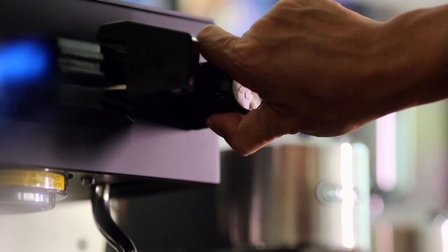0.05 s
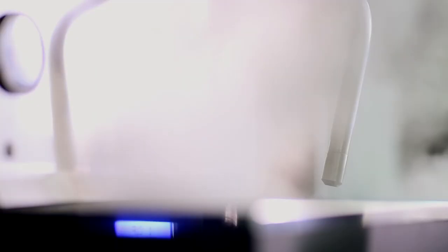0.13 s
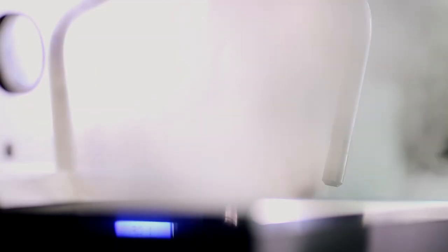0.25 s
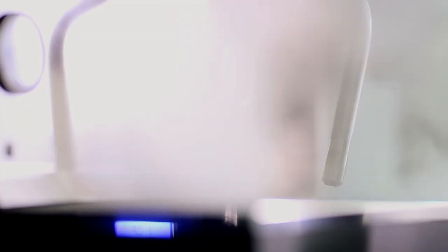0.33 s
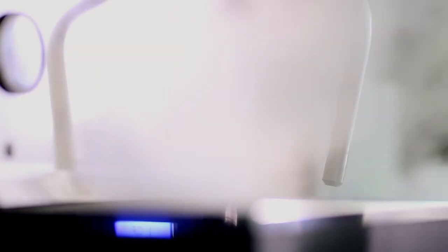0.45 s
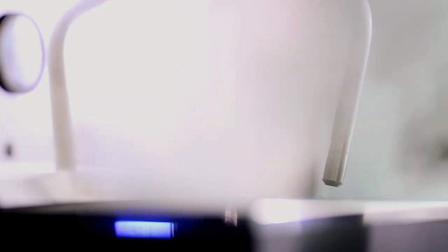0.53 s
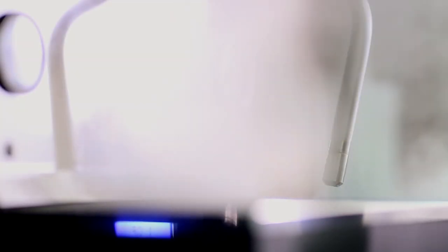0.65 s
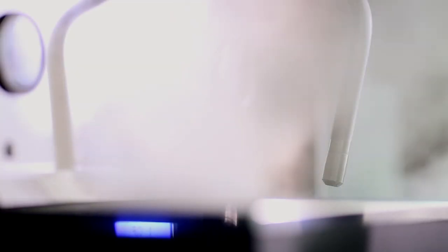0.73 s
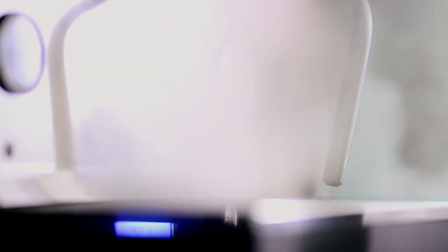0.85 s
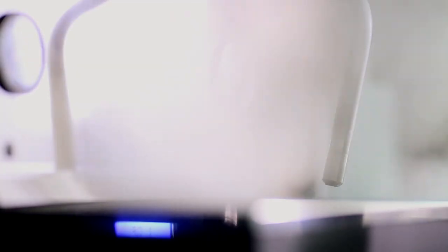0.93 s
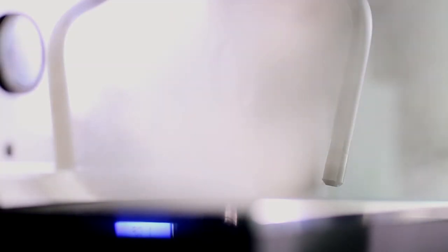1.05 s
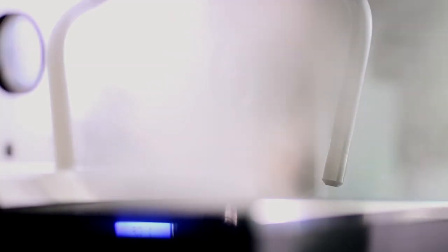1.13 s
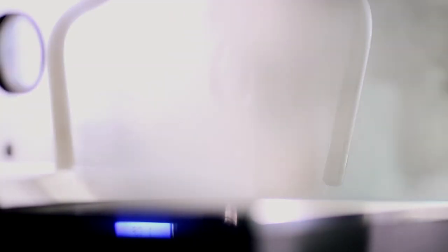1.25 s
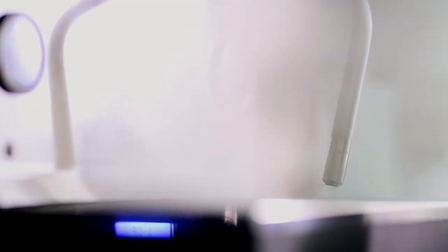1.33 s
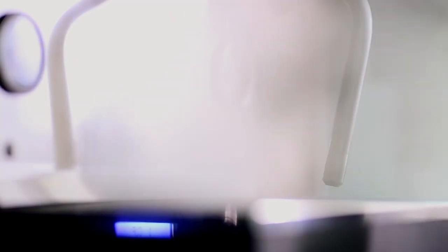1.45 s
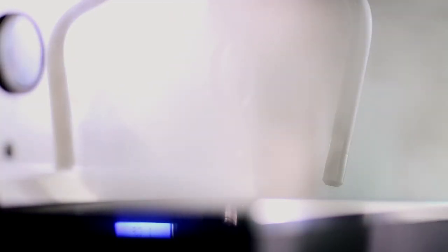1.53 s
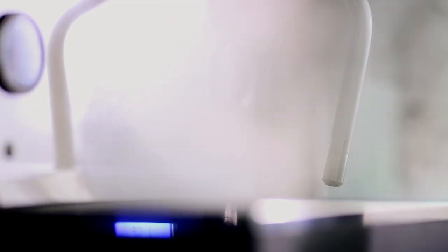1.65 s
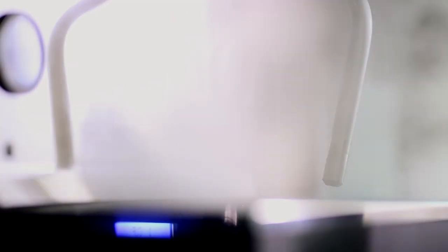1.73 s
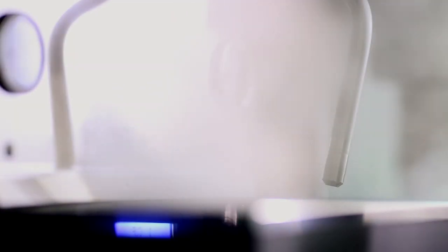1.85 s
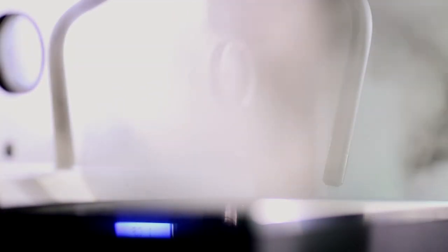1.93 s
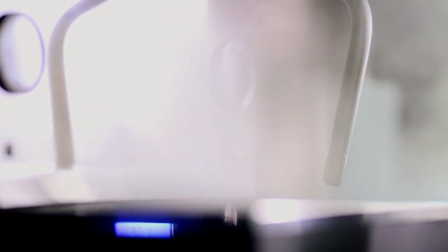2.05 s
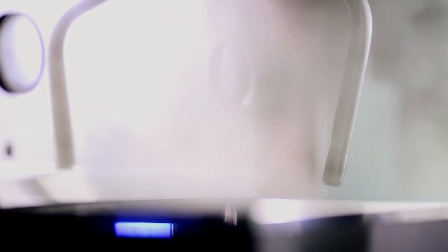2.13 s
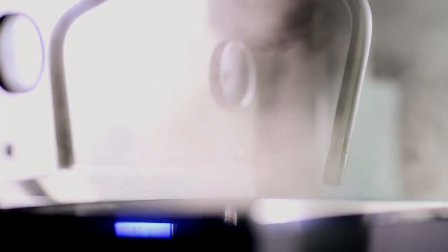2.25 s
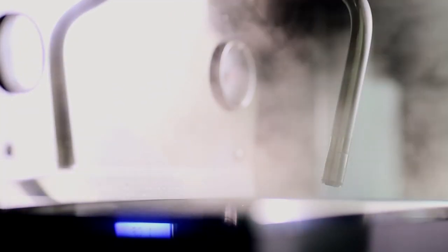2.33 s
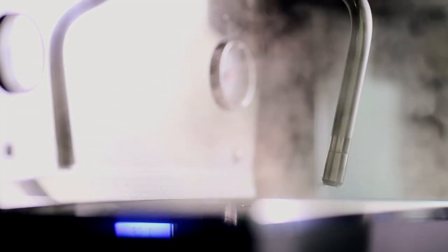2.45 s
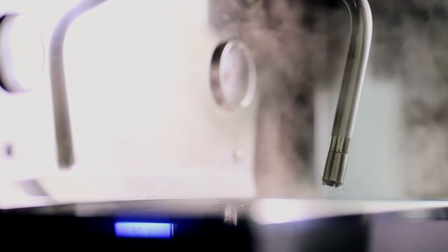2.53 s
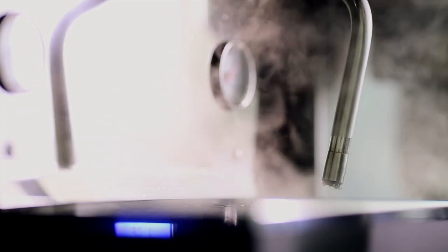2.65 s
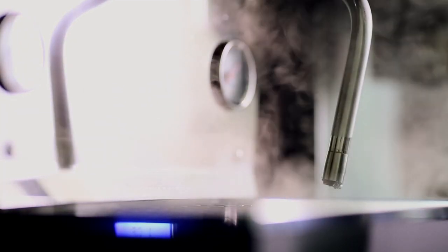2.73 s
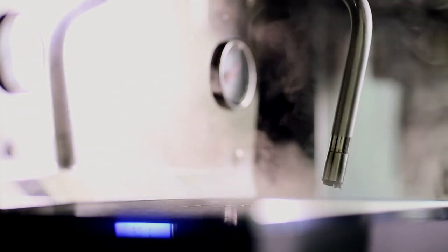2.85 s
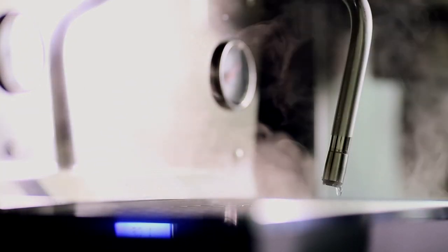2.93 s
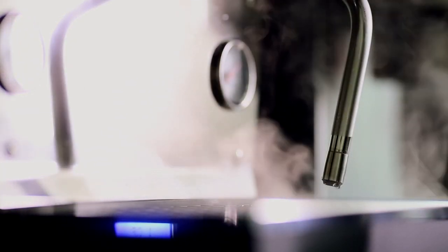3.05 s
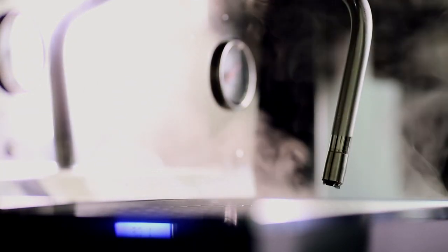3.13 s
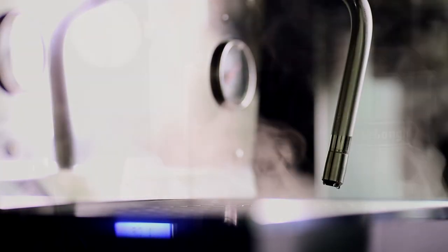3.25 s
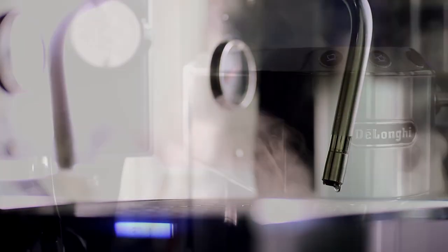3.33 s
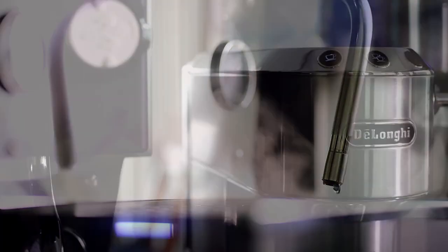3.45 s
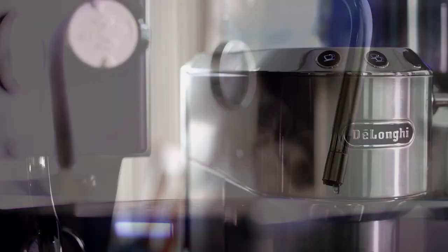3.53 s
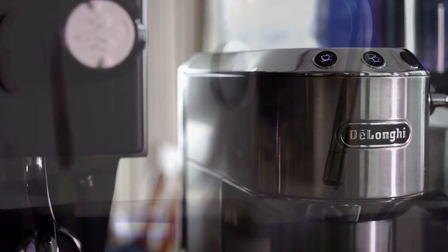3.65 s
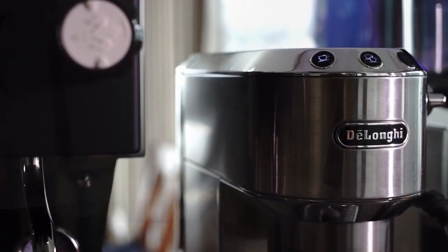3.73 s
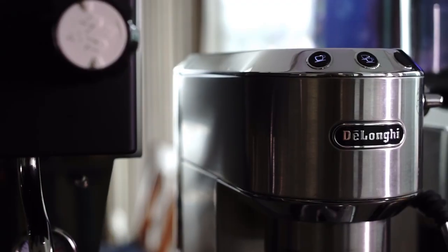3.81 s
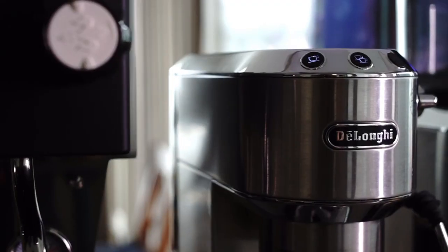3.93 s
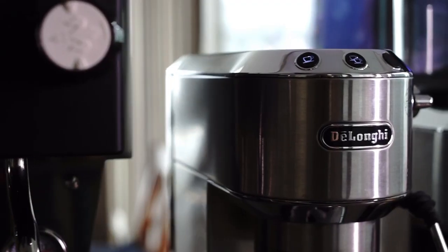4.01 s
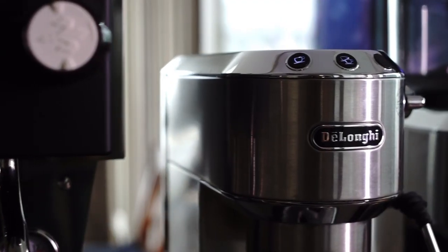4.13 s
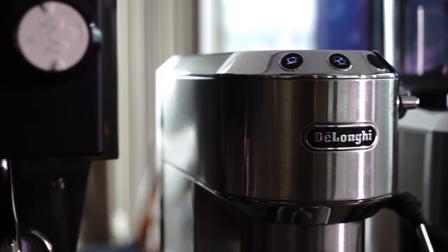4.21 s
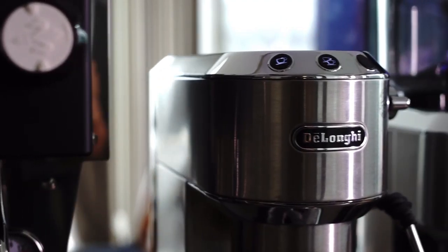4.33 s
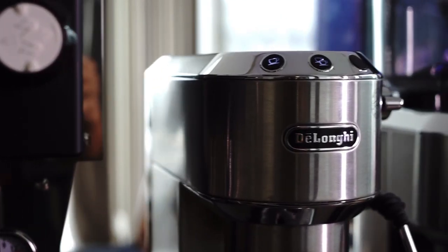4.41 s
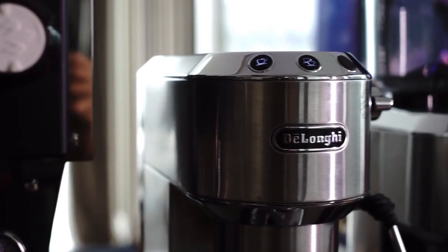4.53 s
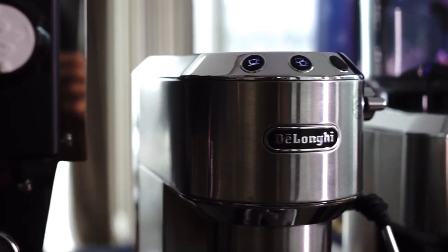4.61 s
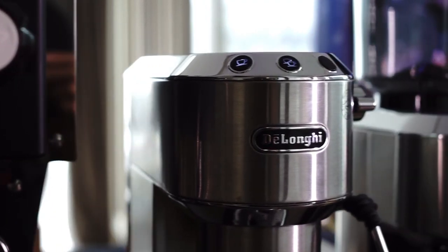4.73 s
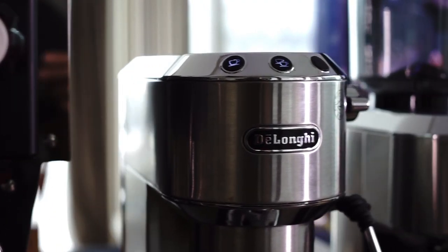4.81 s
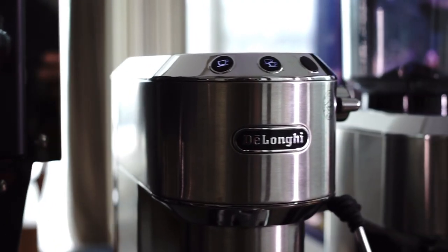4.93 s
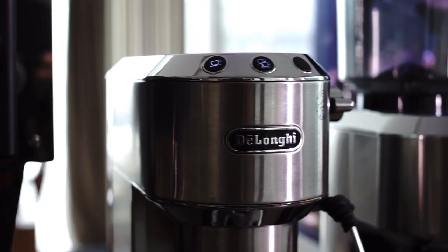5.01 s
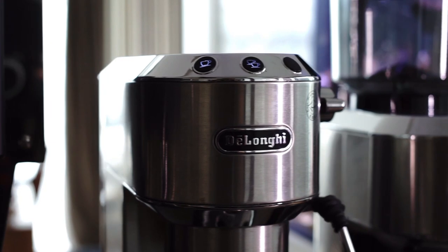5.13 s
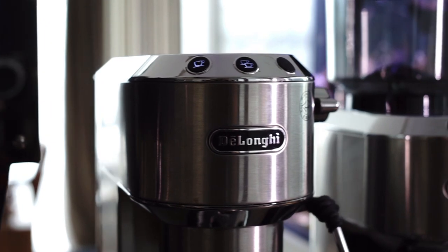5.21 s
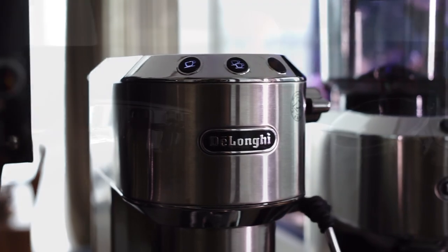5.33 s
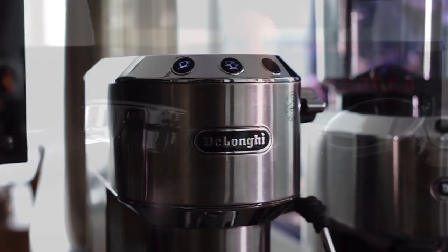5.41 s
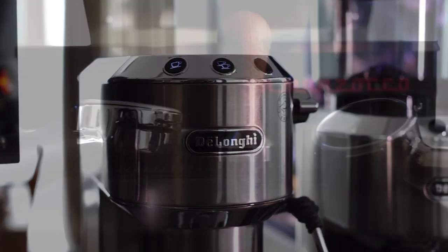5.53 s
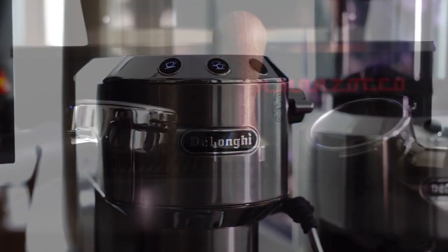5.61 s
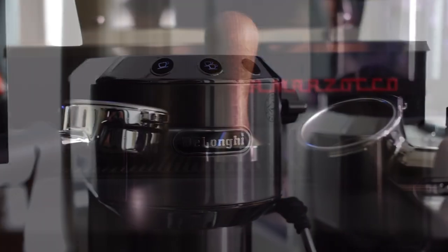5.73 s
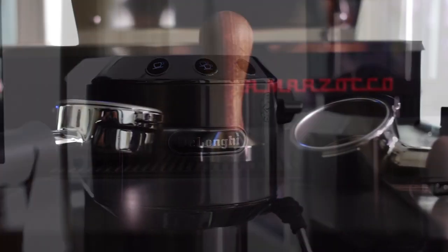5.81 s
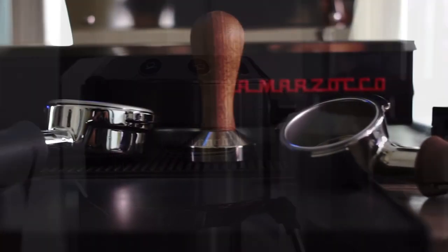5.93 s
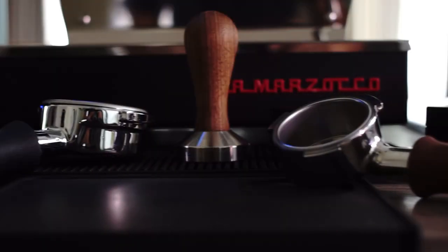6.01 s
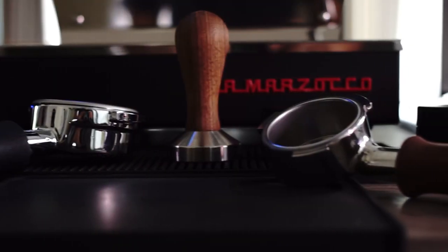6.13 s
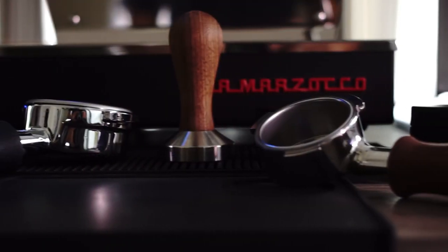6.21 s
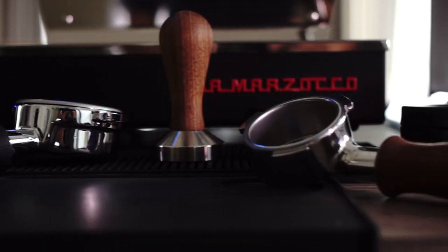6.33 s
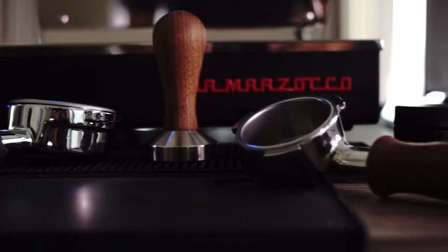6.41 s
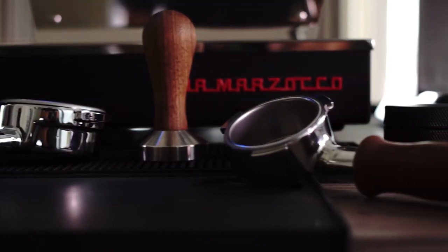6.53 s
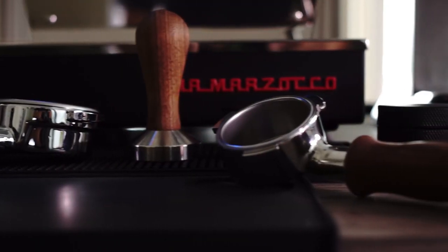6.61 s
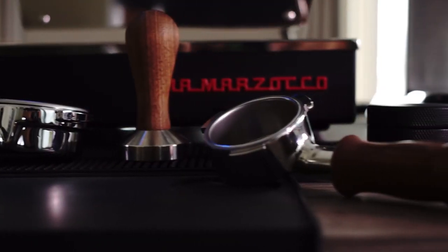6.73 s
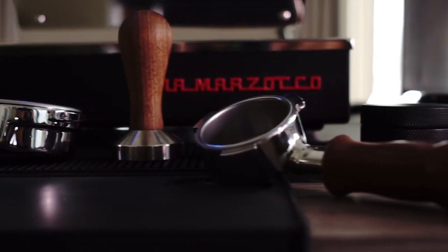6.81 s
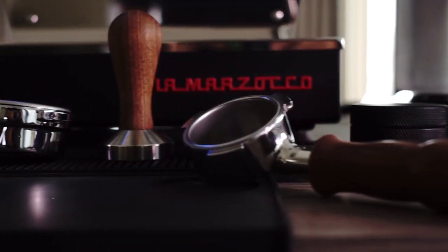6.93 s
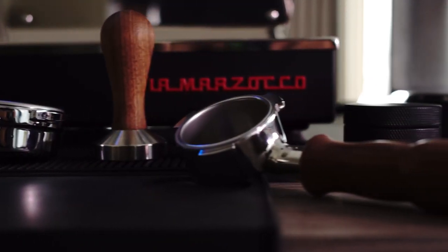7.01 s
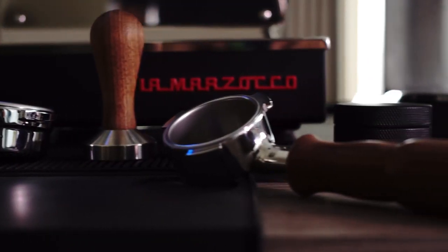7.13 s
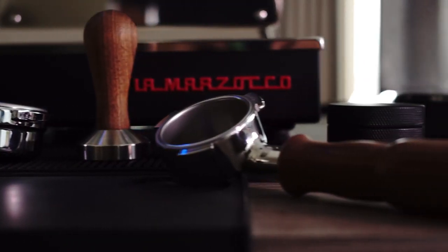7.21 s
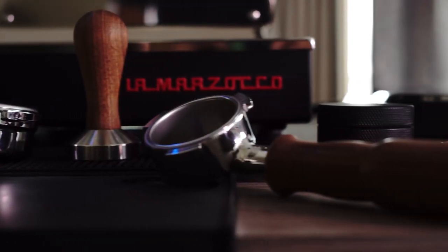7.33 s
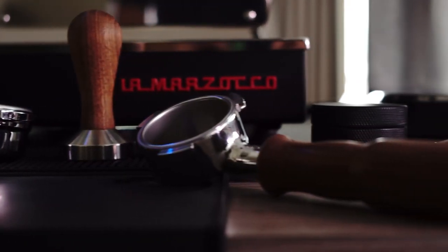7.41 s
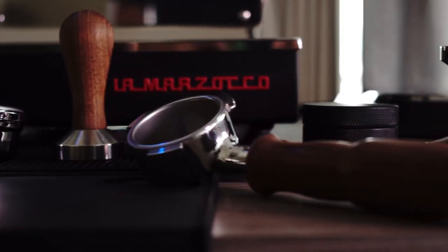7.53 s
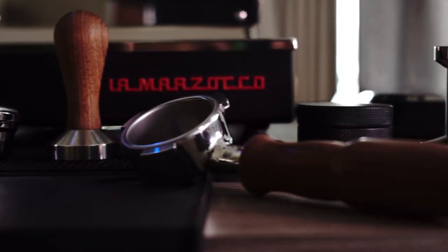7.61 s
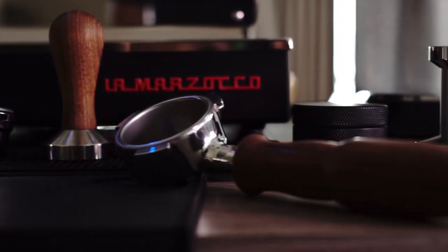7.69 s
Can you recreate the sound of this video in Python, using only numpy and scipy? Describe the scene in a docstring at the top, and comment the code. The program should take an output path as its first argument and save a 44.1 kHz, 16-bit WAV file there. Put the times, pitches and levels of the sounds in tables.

```python
"""A cafe at the microphone: a steam wand's jet hisses at the nozzle and roars on the drip tray, as coloured noise.
At 2.1 s the valve closes; the wand spits once and dribbles out in hollow gulps, noise ringing in pipe modes.
The room comes up: ventilation noise, fluttering low room modes, hum, thin whines and small ticks of banded noise.
The microphone spot fades to a second place from 3.4 s and a third from 5.4 s, where a higher mode throbs
and soft distant tones swell; light dry clicks and a fine crackle, short noise bursts, come close by at the end."""
import sys
import numpy as np
from scipy import signal
from scipy.fft import rfft, irfft, next_fast_len
from scipy.io import wavfile
from scipy.ndimage import uniform_filter1d, map_coordinates

SR = 44100
rng = np.random.default_rng(int(sys.argv[2]) if len(sys.argv) > 2 else 0)


def generate_wav(sig):
    """Save sig (samples, or channels by samples) to the path in sys.argv[1] as 16-bit PCM at SR."""
    pcm = np.round(np.clip(np.atleast_2d(sig).T, -1, 1) * 32767).astype(np.int16)
    wavfile.write(sys.argv[1], SR, pcm)


N = 342216
T = np.arange(N) / SR


def amp(db):
    """Decibels to gain."""
    return 10 ** (np.asarray(db) / 20)


def unit(x):
    """Scale to rms 1."""
    return x / np.sqrt(np.mean(x ** 2) + 1e-20)


def along(points, hz):
    """(f/Hz, value) points joined on a log frequency axis."""
    f, v = np.transpose(points)
    return np.interp(np.log(hz + 1), np.log(f + 1), v)


def wobble(rate):
    """A smooth random curve, rate knots a second."""
    knots = rng.standard_normal(int(N * rate / SR) + 4)
    return map_coordinates(knots, [T * rate])


def fade(start, end):
    """Rises from 0 to 1 between two times."""
    return np.clip((T - start) / max(end - start, 1e-3), 0, 1)


def swells(rows):
    """Sum of smooth bumps, each (t/s, half length/s, height)."""
    return sum(height * np.exp(-((T - s) / half) ** 2) for s, half, height in rows)


def puffs(rows):
    """Gain of sounds that swell out of silence, each (t/s, half length/s, level/dB)."""
    return swells([(s, half, amp(db)) for s, half, db in rows])


def filtered(x, response):
    """x shaped by a response of frequency."""
    size = next_fast_len(N + 8192)
    hz = np.fft.rfftfreq(size, 1 / SR)
    return irfft(rfft(x, size) * response(hz), size)[..., :N]


def colour(spectrum, resonances=()):
    """Response of a broad spectrum lifted or dipped by (f/Hz, full width/Hz, lift/dB) resonances."""
    def response(hz):
        lift_db = sum(db / (1 + (2 * (hz - fc) / width) ** 2) for fc, width, db in resonances)
        return amp(along(spectrum, hz) + lift_db)
    return response


def turbulence(patchy_db):
    """Two unrelated noises whose strength drifts in shared patches of time and frequency."""
    z = signal.stft(rng.standard_normal((2, N)), nperseg=512)[2]
    field = uniform_filter1d(rng.standard_normal(z.shape[1:]), size=8, axis=0)
    field = uniform_filter1d(field, size=12, axis=1)
    return signal.istft(z * amp(patchy_db * unit(field)), nperseg=512)[1][:, :N]


def rush(response, patchy_db, spread=None):
    """Coloured turbulence whose middle has rms 1: mono, or spread by (f/Hz, side over mid/dB) points."""
    def mid_side(hz):
        side_gain = amp(along(spread, hz)) if spread else 0 * hz
        return response(hz) * [np.ones_like(hz), side_gain]
    mid, side = filtered(turbulence(patchy_db), mid_side)
    return np.array([mid + side, mid - side]) / np.std(mid)


def resonance(modes):
    """Even noise of rms 1 ringing in narrow (f/Hz, half width/Hz, level/dB) modes."""
    def response(hz):
        return sum(amp(db) / (1 + ((hz - fc) / width) ** 2) for fc, width, db in modes)
    return unit(filtered(rng.standard_normal(N), response))


def tone(hz, drift, rate):
    """A sine of rms 1 whose phase wanders by drift radians, rate knots a second."""
    return np.sqrt(2) * np.sin(2 * np.pi * hz * T + drift * wobble(rate))


def band_gain(x, lo_hz, hi_hz):
    """The gain that brings one band of a stereo sound's middle to rms 1."""
    return 1 / np.std(filtered(x.mean(0), lambda hz: (hz > lo_hz) & (hz < hi_hz)))


# fades from one microphone spot to the next: start t/s, end t/s
MOVES = [(3.36, 3.87), (5.42, 5.74)]


def spots():
    """The gain of each of the three microphone spots, crossfaded at equal power."""
    first, second = (fade(*move) for move in MOVES)
    return np.sqrt([1 - first, first * (1 - second), second])


# the room's low sounds rise in dB over this time, from this far down under the jet
EMERGE_S, HUSH_DB = (2.04, 2.66), 12


def emerging():
    """Gain of the room's low sounds: faint under the jet, full soon after it."""
    return amp(HUSH_DB * (fade(*EMERGE_S) - 1))


def panels(x, strength, reach, count=24):
    """Steel panels and counter send back many early copies within reach seconds, rippling the spectrum."""
    delay = rng.uniform(.002, reach, count)
    size = rng.standard_normal(count)
    echo = np.bincount((delay * SR).astype(int), strength * size / np.linalg.norm(size))
    echo[0] = 1  # the direct sound
    return signal.fftconvolve(x, echo[None] / np.linalg.norm(echo), axes=1)[:, :N]


# free jet at the nozzle, and jet striking the tray: f/Hz, relative density/dB
HISS_SPECTRUM = [(500, -81), (2000, -17.5), (3300, -8), (3900, -4), (4550, -3.5), (5000, 1), (6200, 2),
                 (8400, 2.5), (10000, 2), (12800, 2.5), (14300, -0.5), (15700, -2.5)]
ROAR_SPECTRUM = [(40, -30.5), (90, -22), (150, -6.5), (350, -8), (560, -4.5), (680, -1), (1000, 1.5),
                 (1500, 0.5), (2200, -2.5), (3000, -0.5), (5000, -16.5), (10000, -41)]
# resonances of tray, casing and nozzle: f/Hz, full width/Hz, lift/dB
CAVITY = [(450, 50, 5), (545, 70, -3.5), (670, 45, 2.5), (880, 120, 3.5), (1075, 40, 2), (1145, 40, -3.5),
          (1330, 50, 2.5), (1490, 160, 2.5), (1915, 35, 2), (2010, 35, 3), (2480, 200, -1.5),
          (2720, 130, 3.5), (2845, 40, -3.5), (2930, 70, 4), (3800, 80, 2), (4090, 45, 4), (4220, 45, 2.5),
          (4930, 55, 4), (5340, 90, 1.5), (5540, 60, -3), (5686, 50, 2), (5827, 40, 2), (6040, 70, 4),
          (6170, 40, 2), (6790, 40, 3), (6940, 45, 2.5), (7110, 50, 3), (7698, 45, 3), (8284, 35, 3),
          (8393, 50, 3.5), (8955, 45, 2.5), (9099, 40, 2), (10186, 50, 2.5), (11257, 45, 3),
          (12490, 40, 2.5)]
# the boiler pressure surges and sags: t/s, half length/s, hiss change/dB, roar change/dB
SURGES = [(0.024, 0.046, .6, 1), (0.115, 0.033, 1.6, 2), (0.217, .07, 0.5, -1), (0.38, .1, -0.7, -2),
          (0.514, 0.026, 1.8, 3), (0.677, 0.082, 0.8, 0.8), (2.07, 0.012, 0.5, 2.5)]
# slugs of wet steam rush through the middle range: t/s, half length/s, level/dB
GUSHES = [(0.025, 0.051, -30.5), (0.11, 0.027, -29.5), (0.58, 0.028, -31), (0.875, .02, -30.5)]
# their spectrum: f/Hz, relative density/dB
GUSH_SPECTRUM = [(100, -55), (700, -16), (1400, -7), (2700, -3), (4200, 3), (5500, 0), (9000, -26)]
# the emptying wand sings hollowly: t/s, half length/s, level/dB, overblown tone level/dB
GULPS = [(2.2, 0.027, -57, -60), (2.31, 0.015, -40, -48), (2.343, 0.023, -49, -46),
         (2.482, 0.047, -45, -56), (2.543, 0.033, -45, -72)]
# pipe tones of the wand, plain and overblown: f/Hz, half width/Hz, relative level/dB
PIPE_MODES = [(440, 18, -1.5), (780, 74, -10), (895, 46, -3), (1040, 60, -13)]
OVERBLOWN_MODES = [(1910, 60, 0)]
HISS_DB, ROAR_DB = -19, -34  # the open jet before surges
ROAR_FALLS = 0.53  # dB of roar per dB of flow as the valve closes
CLOSE_S, CLOSE_DB_PER_S, LEAK_DB = 2.12, 125, 32.5  # the valve shuts down to a leak this far below
DRY_S, DRY_DB_PER_S = 2.62, 220  # the leak dies
SPIT_S, SPIT_DB, SPIT_ATTACK_S, SPIT_T60_S = 2.321, -37, 0.012, 0.25  # the last slug of water


def steam():
    """The jet hisses at the nozzle and roars on the tray; it dulls as the pressure falls, and the pipe sings."""
    surges = np.array(SURGES)
    shut_db = np.clip((T - CLOSE_S) * CLOSE_DB_PER_S, 0, LEAK_DB)
    dry_db = np.maximum(T - DRY_S, 0) * DRY_DB_PER_S
    hiss_db = HISS_DB + swells(surges[:, :3]) - shut_db - dry_db
    roar_db = ROAR_DB + swells(surges[:, [0, 1, 3]]) - ROAR_FALLS * shut_db - dry_db

    since = T - SPIT_S
    spit_attack = np.exp(-(np.minimum(since, 0) / SPIT_ATTACK_S) ** 2)
    spit = spit_attack * amp(SPIT_DB - 60 * np.maximum(since, 0) / SPIT_T60_S)

    flutter = amp(0.4 * wobble(34.3))
    jet = rush(colour(HISS_SPECTRUM, CAVITY), patchy_db=.5)
    slack = unit(filtered(jet, colour([(5000, 8.0), (9000, 0.5), (15000, -9.5)])))  # the weak, dull jet
    closed = fade(2.11, 2.33)
    sputter = amp(1.2 * wobble(70))  # condensate breaks up the weak flow
    flow = (1 - closed) * jet + closed * slack * sputter
    hiss = flow * amp(hiss_db) + spit * (jet + slack) / 2

    roar = rush(colour(ROAR_SPECTRUM, CAVITY), patchy_db=0.5) * (amp(roar_db) + .4 * spit)
    roar = roar + rush(colour(GUSH_SPECTRUM, CAVITY), patchy_db=1.3) * puffs(GUSHES)

    gulps = np.array(GULPS)
    drain = resonance(PIPE_MODES) * puffs(gulps[:, :3])
    drain = drain + resonance(OVERBLOWN_MODES) * puffs(gulps[:, [0, 1, 3]])
    near_nozzle = panels(flutter * hiss, strength=0.31, reach=.035)
    near_tray = panels(flutter * roar, strength=0.24, reach=.035)
    return near_nozzle + near_tray + drain


# stereo width of the room, for these clicks and the ventilation: f/Hz, side over mid/dB
ROOM_SIDE = [(60, -37), (200, -17), (380, -14), (700, -8.5), (1300, -3), (2400, -2), (4400, 0.5),
             (15000, 1)]
# light dry clicks close by: t/s, onset level/dB
CLICKS = [(7.6005, -46), (7.735, -39)]
# a fine dry crackle goes with them: t/s, half length/s, level/dB
CRACKLES = [(7.548, .028, -57), (7.62, .03, -59)]
# spectrum of both: f/Hz, relative density/dB
CLICK_SPECTRUM = [(800, -15), (1500, 5), (3000, 1), (3900, -12), (5500, -22), (15000, -30)]
CLICK_T60_S = .02


def clicks(grain_db=1.0, grains_per_s=500):
    """Each click is a sudden noise burst that dies quickly; the crackle is noise with a fast random grain."""
    gain = sum((T >= s) * amp(db - 60 * np.maximum(T - s, 0) / CLICK_T60_S) for s, db in CLICKS)
    crackle = puffs(CRACKLES) * unit(amp(grain_db * wobble(grains_per_s)))
    return (gain + crackle) * rush(colour(CLICK_SPECTRUM), patchy_db=-2.5, spread=ROOM_SIDE)


# fainter ticks at random; the level is before the gain given in ticks()
FAINT_TICKS_PER_S, FAINT_TICK_DB, FAINT_SPREAD_DB = 4, -65, -8
FAINT_TICK_HZ, FAINT_TICK_WIDTH = (2800, 12000), 0.098  # range of their centres; width over centre


def faint_ticks():
    """Rows like TICKS, scattered from the first move to the end."""
    start, end = MOVES[0][0], N / SR
    when, pitch, size = rng.random((int(FAINT_TICKS_PER_S * (end - start)), 3)).T
    s = start + when * (end - start)
    hz = FAINT_TICK_HZ[0] * (FAINT_TICK_HZ[1] / FAINT_TICK_HZ[0]) ** pitch
    db = FAINT_TICK_DB + FAINT_SPREAD_DB * (2 * size - 1)
    return list(zip(s, hz, FAINT_TICK_WIDTH * hz, db))


# the clearer small ticks about the room: t/s, centre f/Hz, nominal width/Hz, level/dB before gain_db
TICKS = [(2.596, 3000, 7000, -52), (2.594, 2380, 1310, -52), (2.655, 10100, 2000, -58),
         (2.767, 7660, 1200, -63), (3.125, 3700, 895, -55), (3.255, 3700, 304, -56),
         (3.262, 4670, 350, -60), (3.26, 7000, 400, -64), (3.53, 11000, 4000, -61), (3.868, 3900, 300, -59),
         (3.868, 9000, 3000, -60), (4.092, 12700, 1500, -59), (4.178, 10000, 2000, -65),
         (4.27, 4750, 450, -58), (4.328, 14300, 700, -65), (4.412, 3400, 300, -53),
         (4.411, 8000, 7000, -56), (4.595, 4400, 240, -60), (4.703, 7100, 450, -61),
         (4.728, 14100, 1300, -60), (4.766, 4630, 380, -51.5), (4.768, 10100, 6000, -55),
         (5.252, 11100, 6000, -57), (5.29, 7200, 500, -63), (5.326, 7000, 6000, -54),
         (5.328, 2200, 1800, -50), (5.372, 3800, 1800, -56), (5.444, 12300, 1800, -58),
         (5.444, 7000, 600, -61), (5.543, 6700, 800, -59), (5.598, 4300, 280, -57.5),
         (5.625, 10500, 2500, -63), (5.803, 7000, 8000, -55), (6.122, 2970, 250, -61),
         (6.185, 7500, 3500, -59), (6.326, 3600, 1500, -57), (6.686, 8800, 600, -63),
         (6.688, 13000, 2500, -61), (7.172, 4700, 1500, -60), (7.44, 11500, 4000, -63)]


def ticks(rise=0.0021, t60=0.14, gain_db=5.0, skirt=.4, skirt_spread=2.6):
    """Each distant tick is a ringing band with wider skirts, blurred by the room; broad ones start sharper."""
    t = np.arange(SR // 4) / SR - .04  # s from the tick's peak
    hz = np.fft.rfftfreq(len(t), 1 / SR)
    out = np.zeros((2, N + SR))
    for s, centre, width, db in list(TICKS) + faint_ticks():
        attack = np.exp(-.5 * (np.minimum(t, 0) / rise) ** 2 * width / 1500)  # rise/s holds at 1500 Hz width
        shape = attack * amp(-60 * np.maximum(t, 0) / t60)
        off = 1.14 * (hz - centre) / width
        band = 1 / (1 + off ** 6) + skirt / (1 + (off / skirt_spread) ** 4)
        puff = irfft(rfft(rng.standard_normal((2, len(t)))) * band, len(t))
        if s < MOVES[0][0]:
            puff = puff[[0, 0]]  # mono at the first spot
        puff = unit(puff + 0.15 * puff[::-1])
        out[:, round((s + t[0]) * SR):][:, :len(t)] += amp(db + gain_db) * shape * puff
    return out[:, :N]


# soft distant tones: t/s, half length/s, f/Hz, level/dB
FAR_TONES = [(5.74, 0.067, 690, -52), (5.866, 0.062, 690, -49), (7.33, 0.32, 1060, -58)]


def far_tones(half_width_hz=42):
    """Each far tone is a fuzzy line of ringing noise that swells and fades."""
    return sum(resonance([(hz, half_width_hz, 0)]) * puffs([(s, half, db)])
               for s, half, hz, db in FAR_TONES)


# thin motor whines, levels before swells:
# f/Hz, level/dB at the second spot, at the third, swells as (t/s, half length/s, lift/dB)
WHINES = [(3660, -69, -78, [(5.44, .06, 9), (5.55, .04, -2)]), (7450, -78, -100, [(5.15, .06, 6)]),
          (8040, -100, -80, [(6.22, .09, 10), (7.66, .13, 12)]), (11326, -84, -82, [(6.52, .045, 16)])]


def whines(flutter_db=4.0, flutter_per_s=40):
    """Each whine is one unbroken line that trembles in pitch and level and swells now and then."""
    later = spots()[1:]
    out = np.zeros(N)
    for hz, second_db, third_db, lifts in WHINES:
        level = amp([second_db, third_db]) @ later
        tremble = amp(swells(lifts) + flutter_db * wobble(flutter_per_s))
        out += level * tremble * tone(hz, drift=0.71, rate=90)
    return out


# appliance hum at each spot, before swell and waver: f/Hz, level/dB
HUM_1 = [(133, -53.5)]
HUM_2 = [(66.6, -48.5)]
HUM_3 = [(100, -53.5)]
# the first hum swells: t/s, half length/s, lift/dB
HUM_1_SWELL = [(3.15, 0.2, 8.5)]
HUM_1_RISE_S, HUM_1_HUSH_DB = (1.86, 2.3), 10.5  # the first hum comes up as the jet ends


def appliances():
    """Motors hum in the bass as sines that waver slightly in level and phase."""
    first, second, third = spots()
    hum_db = HUM_1_HUSH_DB * (fade(*HUM_1_RISE_S) - 1) + swells(HUM_1_SWELL)
    motors = [(HUM_1, first * amp(hum_db)), (HUM_2, second), (HUM_3, third)]
    out = np.zeros(N)
    for lines, gain in motors:
        for hz, db in lines:
            unsteady = np.log(max(hz, 60) / 45)  # higher lines waver more
            level = amp(db + 0.54 * unsteady * wobble(9.6))
            out += gain * level * tone(hz, drift=0.15 * unsteady, rate=32)
    return out


# the two strongest room modes, before swells: f/Hz, level/dB at the first, second, third spot
BOOM_MODES = [(168.5, -54.5, -53.5, -52.5), (249, -53.5, -54, -53.5)]
# their strongest swells: t/s, half length/s, lower mode lift/dB, upper mode lift/dB
BOOMS = [(2.76, 0.017, -3, 16), (2.874, 0.031, 14, 11), (3.0, 0.06, 10, 13), (3.17, .04, 10, 4),
         (3.285, 0.056, 12.5, 11.5), (3.63, 0.034, 3, -9), (3.9, 0.052, 5, 15), (4.114, 0.049, 6, 13.5),
         (4.36, 0.054, 7, 13), (4.53, 0.11, 8, 17), (4.67, 0.045, 9, 2), (4.855, 0.087, 0, 16.5),
         (5.016, 0.057, -2, 9), (5.168, 0.074, 12.5, 12), (5.38, 0.037, 10, 10), (5.517, .04, 6, -3),
         (6.004, .05, 9.5, 1), (6.14, 0.055, 5.5, 13.5), (6.317, 0.082, 10.5, 6), (6.6, 0.072, 6, 6),
         (6.77, .06, 0, 5), (6.887, 0.059, 16.5, 1), (7.027, 0.04, 7, 1), (7.377, 0.064, 11.5, 7.5),
         (7.656, 0.14, 13, 5.5)]
# how far their phase wanders: one value per spot/rad
BOOM_DRIFT = [1.47, 0.69, 0.62]
# a higher room mode at the last spot: f/Hz, half width/Hz, relative level/dB
DRONE_MODES = [(562, 29, 3), (617, 7.6, 2)]
# it throbs: t/s, half length/s, lift/dB
DRONE_SWELLS = [(5.9, 0.043, 6), (6.035, .015, 4), (6.25, 0.035, 6.5), (6.42, .025, 6), (6.57, 0.013, 12),
                (6.635, 0.025, 10), (6.835, 0.04, 12.5), (7.15, 0.021, 9), (7.615, 0.022, 9)]
DRONE_DB = -51.5  # its middle between throbs


def boom(waver_db=1.5, flutter_per_s=24):
    """Low room modes ring as fluttering near-tones that keep swelling; a higher one rings as narrow noise."""
    shares, low = spots(), np.zeros(N)
    for k, (hz, *spot_db) in enumerate(BOOM_MODES):
        swell_db = swells([(s, half, lifts[k]) for s, half, *lifts in BOOMS])
        flutter = amp(swell_db + waver_db * wobble(flutter_per_s))
        low += amp(spot_db) @ shares * flutter * tone(hz, drift=BOOM_DRIFT @ shares, rate=17)
    middle = resonance(DRONE_MODES)
    side = 0.36 * np.outer([1, -1], resonance(DRONE_MODES))
    drone = (middle + side) * amp(DRONE_DB + swells(DRONE_SWELLS))
    return low * emerging() + shares[2] * drone


# rumble at each spot: f/Hz, relative density/dB
RUMBLE_1 = [(25, -16), (75, -13.5), (110, -15), (160, 0), (280, -1), (380, -5), (620, -8.5), (1100, -26),
            (2500, -41.5)]
RUMBLE_2 = [(25, -13.5), (70, -10), (100, -7), (160, -3.5), (215, -2), (290, -6.5), (370, -8.5),
            (550, -12.5), (900, -23.5), (2200, -57)]
RUMBLE_3 = [(25, -12), (65, -14), (100, -8), (160, -3.5), (215, -1.5), (280, -6), (380, -10), (640, -14),
            (800, -24), (1050, -27), (1400, -29.5), (3000, -68)]
# room resonances in the rumble at each spot: f/Hz, full width/Hz, lift/dB
RING_1 = [(134, 12, 3), (288, 19, 3.5), (364, 11, 1.5), (612, 18, 8), (950, 25, 15)]
RING_2 = [(150, 13, 2), (295, 29, 5.3), (412, 21, 4.9), (524, 27, 4.5)]
RING_3 = [(144, 17, 2.2), (285, 44, 1.1), (485, 65, 2.7), (762, 20, 6.8), (930, 51, 8.8)]
# airy hiss at each spot: f/Hz, relative density/dB
AIR_1 = [(200, -4), (700, 6.5), (1300, 5.5), (2200, 0.5), (3200, -4.5), (5000, -9.5), (8000, -13.5),
         (11000, -20), (15500, -30)]
AIR_2 = [(200, -28), (700, 6), (1100, 5), (1400, -2), (2200, -2), (3700, -9.5), (5000, -13), (7000, -16.5),
         (10000, -18), (11600, -15), (13000, -20), (15500, -22)]
AIR_3 = [(200, -20), (900, 5), (1300, -5), (1700, -3.5), (2050, 0), (2400, -2.5), (3000, -2.5), (4600, -2),
         (6200, -9), (8100, -8.5), (10000, -10.5), (11500, -9.5), (13500, -13), (15500, -16)]
# faint resonances in the airy hiss: f/Hz, full width/Hz, lift/dB
AIR_RING = [(2570, 240, -2), (2830, 150, 3), (4300, 370, 0.6), (11700, 300, 2)]
# one row per spot, before swells: rumble level/dB in 290-520 Hz, air level/dB in 1200-4000 Hz
ROOM_DB = [(-48, -49), (-46, -53), (-48.5, -59.5)]
# rumble and air swell and sink: t/s, half length/s, lift/dB
RUMBLE_SWELLS = [(2.68, 0.12, -1), (2.95, .12, 1.5), (3.25, 0.11, 2), (3.52, 0.096, -2.5),
                 (4.48, 0.17, -0.5), (5.7, 0.23, -2)]
AIR_SWELLS = [(2.78, 0.068, -2), (3.08, 0.32, 2.5), (3.65, .12, -2.5), (5.36, 0.14, 1), (7.6, 0.21, 1)]
AIR_RISE_S, AIR_HUSH_DB = (2.58, 2.6), 19  # the airy hiss comes up faster than the rumble


def ventilation():
    """Moving air rumbles under a hiss, coloured anew at each spot; the first spot is mono."""
    colours = [(RUMBLE_1, RING_1, AIR_1, None),
               (RUMBLE_2, RING_2, AIR_2, ROOM_SIDE),
               (RUMBLE_3, RING_3, AIR_3, ROOM_SIDE)]
    rumble_gain = emerging() * amp(swells(RUMBLE_SWELLS))
    air_gain = amp(AIR_HUSH_DB * (fade(*AIR_RISE_S) - 1) + swells(AIR_SWELLS))
    out = np.zeros((2, N))
    for share, (rumble_db, air_db), (low, ring, high, spread) in zip(spots(), ROOM_DB, colours):
        rumble = rush(colour(low, ring), patchy_db=0.84, spread=spread)
        rumble = rumble * band_gain(rumble, 290, 520)
        air = rush(colour(high, AIR_RING), patchy_db=1.13, spread=spread)
        air = air * band_gain(air, 1200, 4000)
        out += share * (rumble * rumble_gain * amp(rumble_db) + air * air_gain * amp(air_db))
    return out


def scene(lean_db=0.38):
    """Steam in the middle; from the later spots the room leans slightly to the right."""
    room = clicks() + ticks() + far_tones() + whines() + appliances() + boom() + ventilation()
    lean = amp(np.outer([-1, 1], lean_db * fade(*MOVES[0])))
    return steam() + room * lean


TOP_HZ = 15800  # band limit


def record(dry):
    """Nothing is kept above the band limit."""
    return filtered(dry, lambda hz: hz < TOP_HZ)


dry = scene()
out = record(dry)
generate_wav(out)
```